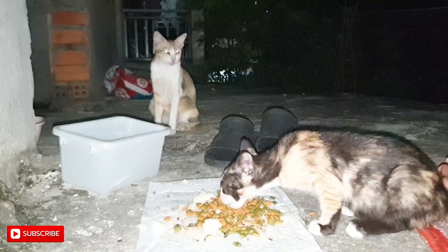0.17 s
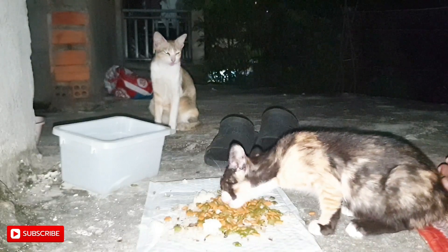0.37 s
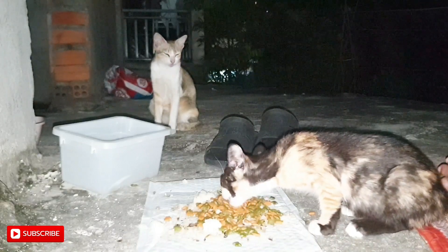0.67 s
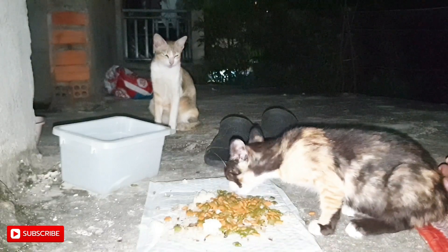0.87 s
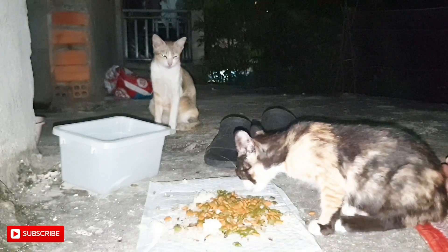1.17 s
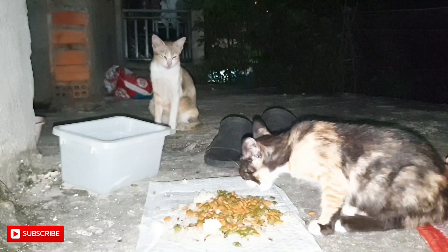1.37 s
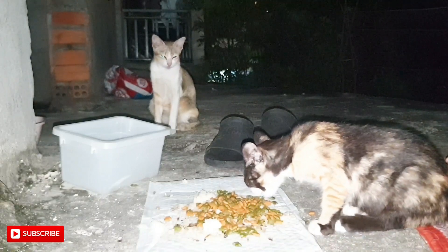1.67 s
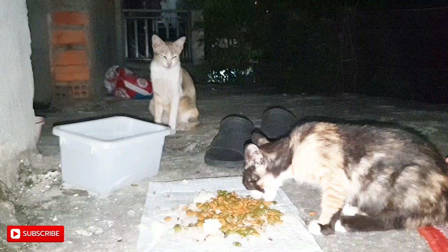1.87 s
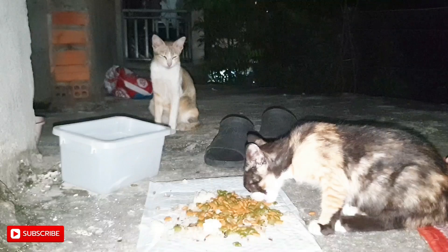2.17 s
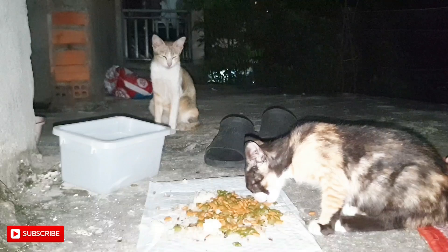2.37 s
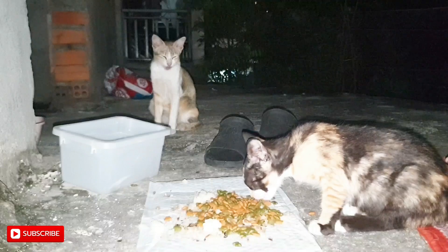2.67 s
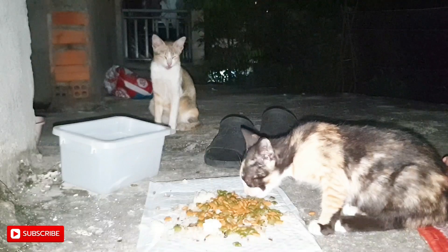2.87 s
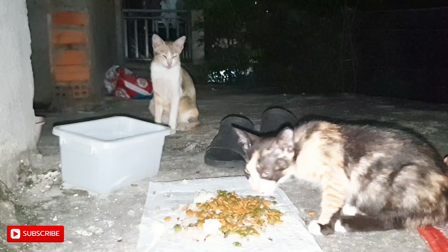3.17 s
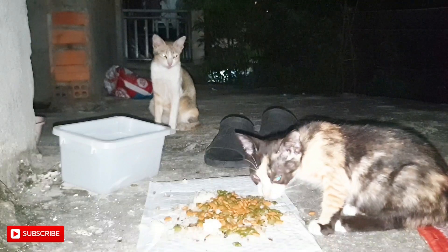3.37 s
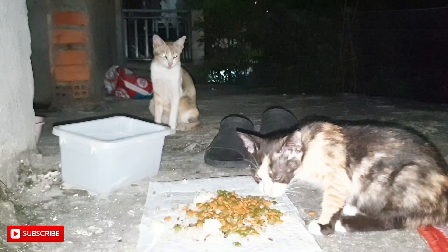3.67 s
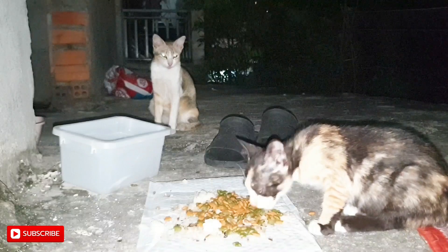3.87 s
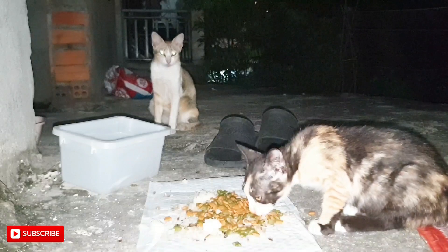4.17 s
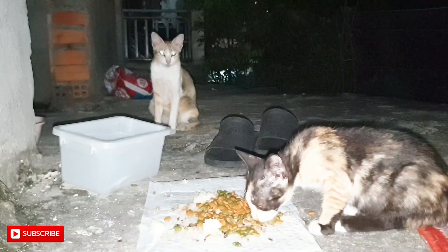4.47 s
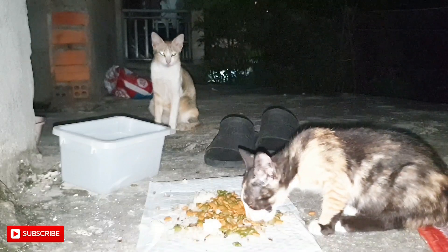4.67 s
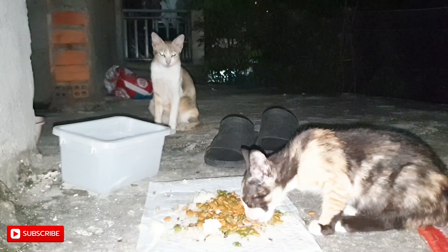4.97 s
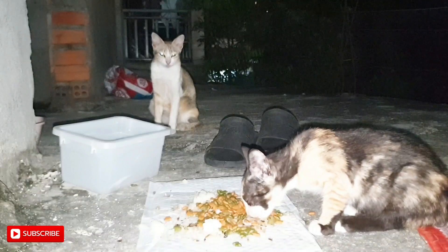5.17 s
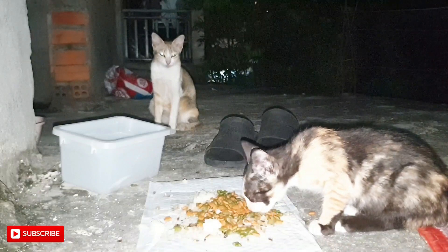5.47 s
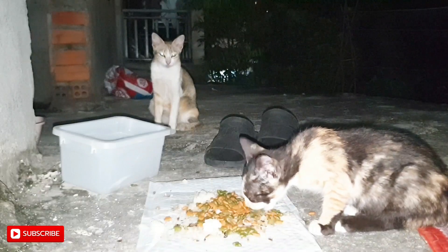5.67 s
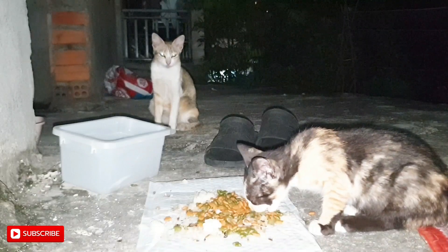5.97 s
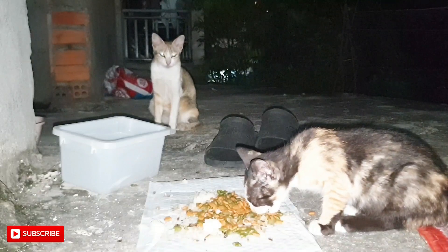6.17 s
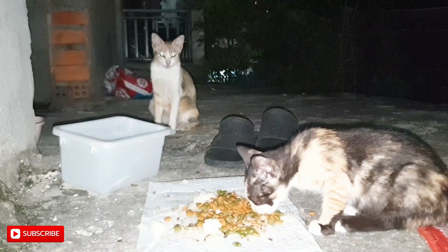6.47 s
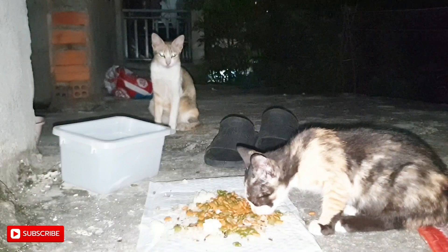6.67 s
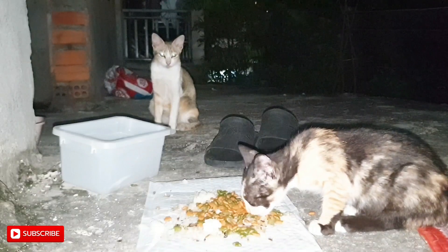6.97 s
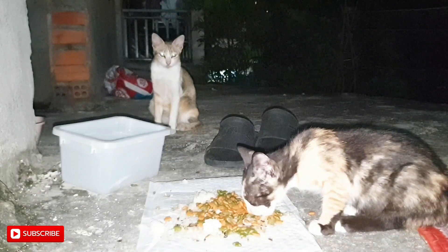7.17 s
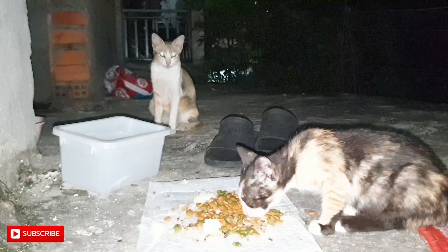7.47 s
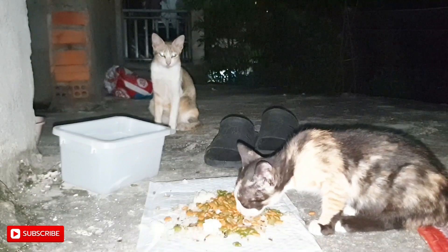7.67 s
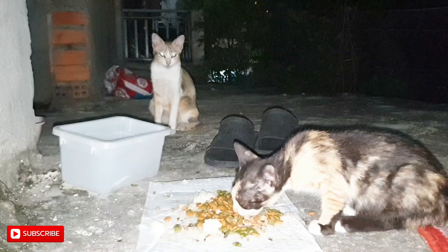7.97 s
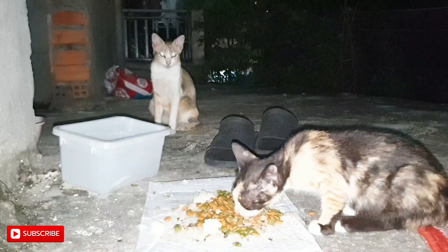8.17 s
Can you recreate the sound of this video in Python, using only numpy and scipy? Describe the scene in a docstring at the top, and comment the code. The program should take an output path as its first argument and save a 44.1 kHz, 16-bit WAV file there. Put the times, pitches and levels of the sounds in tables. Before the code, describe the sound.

A quiet concrete yard at night, heard on a hand-held camera with sound mostly on the left. Low traffic rumble and a wavering hum run throughout; a distant engine rises in pitch and fades by about 3.4 s, while the drone slowly recedes. From 0.15 s, faint dry scrapes around 3 kHz repeat every quarter second or so. Cracks of kibble at 1.7 and 2.0 s mix with tiny ratcheting creaks until 2.9 s. From 3 to 4.8 s fingers and cloth rustle lightly, with a very short rough squeal at 3.7 s. Scraping continues; sharp cracks land at 5.4 and 6.0 s. From 6.4 to 7.4 s louder creaks come in regular strokes, with a second squeal at 6.9 s and thin peeps. From 7.6 s close, hollow rubbing swells, with strong cracks near 7.8 and 8.1 s, ending at 8.3 s with soft microphone hiss.

```python
"""Far traffic rumbles and fades over a yard at night, heard by a hand-held camera with its right port
almost covered. A dry joint rocks, scraping, creaking and twice squealing; a cat cracks kibble; fingers and
cloth rustle and tick on the camera. The joint rings with noise and slips, squeals stack sine overtones, cracks
are struck resonances, rustling is shaped noise and clicks, traffic is noise bands and sines. Each port hisses."""
import sys
import numpy as np
from scipy import signal
from scipy.fft import rfft, irfft, next_fast_len
from scipy.io import wavfile
from scipy.ndimage import uniform_filter1d, map_coordinates

SR = 44100
rng = np.random.default_rng(int(sys.argv[2]) if len(sys.argv) > 2 else 0)


def pcm_store(signal):
    """Save signal as 16-bit PCM."""
    levels = np.round(np.clip(np.atleast_2d(signal), -1, 1) * 32767)
    wavfile.write(sys.argv[1], SR, levels.astype(np.int16).T)


N = 366012

# how sounds close to the camera divide between the ports: pitch_hz [Hz], left_over_right_db [dB]
CLOSE_BALANCE = [(1500, 31.5), (5000, 25), (7500, 21), (9500, -3), (10500, -5.5), (12000, 8), (15000, 19)]
# how the joint divides between the ports: pitch_hz [Hz], left_over_right_db [dB]
JOINT_SIDES = [(1600, 32.5), (3200, 17), (4800, 16), (9000, 9)]
# treble colour of rubbing, also used for cracking: pitch_hz [Hz], level_db [dB per Hz, relative]
RUB_TREBLE = [(4410, -54), (7500, -31), (7940, -32), (8670, -12.5), (9740, -0.5), (10500, 6.5),
              (12600, 2.5), (15100, 6.5), (15900, -12.5)]


def amp(db):
    """Gain of a level in dB."""
    return 10 ** (np.asarray(db) / 20)


def unit(x):
    """x at rms 1."""
    return x / np.sqrt(np.mean(x ** 2) + 1e-30)


def along(points, hz):
    """Reads a curve of (Hz, value) points on a log frequency axis."""
    f, v = np.transpose(points)
    return np.interp(np.log(hz + 1), np.log(f + 1), v)


def played(rows):
    """First sample, and one value per sample for each column while the table lasts."""
    s, *cols = np.transpose(rows)
    n = np.arange(round(s[0] * SR), min(round(s[-1] * SR), N))
    return n[0], [np.interp(n / SR, s, c) for c in cols]


def add(track, start, sound):
    """Mixes a sound into the track."""
    end = min(start + len(sound), N)
    track[start:end] += sound[:end - start]


def wobble(rate):
    """A smooth random curve, rate knots a second."""
    knots = rng.standard_normal(int(N * rate / SR) + 4)
    return map_coordinates(knots, [np.arange(N) * rate / SR])


def sine(pitch_hz):
    """A sine that follows a changing pitch."""
    return np.sin(2 * np.pi * np.cumsum(pitch_hz) / SR)


def filtered(x, response):
    """x shaped by a response that may also shift phase."""
    m = next_fast_len(x.shape[-1] + 8192)
    return irfft(rfft(x, m) * response(np.fft.rfftfreq(m, 1 / SR)), m)[..., :x.shape[-1]]


def resonance(centre_hz, width_hz):
    """One way a body can ring: strongest at its centre, starting only when driven."""
    return lambda f: 1j * f * width_hz / (centre_hz ** 2 - f * f + 1j * f * width_hz)


def noise(spectrum):
    """Two unrelated noises of one colour, rms 1."""
    return unit(filtered(rng.standard_normal((2, N)), lambda hz: amp(along(spectrum, hz))))


def ports(pair, balance, alike):
    """The open left port hears the first of the pair; the covered right one a reweighted mix of both."""
    def response(hz):
        share = np.clip(along(alike, hz), -1, 1)  # left-right likeness
        weak = amp(-along(balance, hz))
        # the two port gains average 1 at every frequency
        return 2 / (1 + weak) * np.array([1 + 0 * hz, weak * share, weak * np.sqrt(1 - share ** 2)])
    left, same, other = filtered(pair[[0, 0, 1]], response)
    return np.array([left, same + other])


def walls(x):
    """The yard walls answer with decaying noise, each frequency dying at its own speed."""
    # how long the answer takes to fall 60 dB: pitch_hz [Hz], fall_s [s]
    decay = [(1000, 0.12), (3000, 0.18), (8000, 0.037)]
    hz, t, z = signal.stft(rng.standard_normal((2, SR // 2)), SR, nperseg=256)
    tail = signal.istft(z * amp(-60 * t / along(decay, hz)[:, None]), SR, nperseg=256)[1]
    late = np.pad(x, (300, 0))[None]  # samples of delay
    return signal.fftconvolve(late, tail / np.linalg.norm(tail[0]), axes=1)[:, :N]


def through_joint(drive, envelope, centre_hz, width_hz):
    """The joint's body rings in one steep band, passes little treble and outlasts the stroke a moment."""
    def body(f):
        band = resonance(centre_hz, width_hz)(f) * resonance(centre_hz, 3.2 * width_hz)(f) ** 3
        return band / (1 + 1j * f / 4000) ** 4
    level = np.sqrt(np.mean(filtered(drive, body) ** 2))
    return filtered(np.pad(drive * envelope, (0, 400)), body) / level


def joint():
    """Scrapes, creaks and peeps of the dry joint, with the yard walls answering."""
    dry = scrapes() + creaks() + peeps()
    return ports(dry + amp(-19.5) * walls(dry), JOINT_SIDES, [(1000, 1.0)])


def scrapes():
    """Smooth sliding drives the joint with noise, ringing a drifting band and a thin upper mode."""
    # smooth strokes: start_s [s], length_s [s], level_db [dB]
    strokes = [(0.154, 0.09, -70.5), (0.361, 0.11, -71), (0.568, 0.13, -71), (0.755, 0.12, -71),
               (0.969, 0.15, -70.5), (1.217, 0.063, -69.5), (1.427, 0.096, -70.5), (1.905, 0.36, -70.5),
               (2.969, 0.14, -69), (3.224, 0.086, -73.5), (3.434, 0.1, -67), (3.843, 0.1, -68),
               (4.015, 0.2, -72), (4.258, 0.094, -74), (4.545, 0.18, -72.5), (4.809, 0.16, -73.5),
               (5.075, 0.15, -70), (5.33, 0.15, -70.5), (5.607, 0.12, -69.5), (5.862, 0.14, -71.5),
               (6.137, 0.13, -73.5), (6.409, .14, -69.5), (6.696, 0.13, -68.5), (6.963, 0.24, -70),
               (7.172, .14, -69)]
    # the drifting band: start_s [s], centre_hz [Hz], width_hz [Hz], upper_mode_db [dB, relative]
    drift = [(.62, 3410, 60, -20), (.8, 3260, 248, -26), (2.9, 3220, 380, -17), (3.4, 3360, 200, -17),
             (4.9, 3410, 380, -7), (6.1, 3440, 380, -12), (7.2, 3040, 298, -25)]
    upper_hz, upper_width_hz = 4015, 130
    dry = np.zeros(N)
    when, centre, spread, upper_db = np.transpose(drift)
    for s, length, db in strokes:
        u = np.linspace(0, 1, round(length * SR))
        drive = rng.standard_normal(len(u))
        envelope = amp(db) * np.sin(np.pi * u) ** 0.45
        main = through_joint(drive, envelope, np.interp(s, when, centre), np.interp(s, when, spread))
        upper = through_joint(drive, envelope, upper_hz, upper_width_hz)
        add(dry, round(s * SR), main + amp(np.interp(s, when, upper_db)) * upper)
    return dry


def creaks():
    """The joint sticks and slips: each slip is a click that rings three modes and drags grit behind it."""
    # sticking strokes: start_s [s], length_s [s], loudest_at [0-1 of the stroke], top_db [dB],
    # slips_per_s [1/s, before it quickens], centre_hz [Hz]
    strokes = [(1.529, 0.032, 0.1, -53, 1030, 3030), (1.789, 0.022, 0.16, -57.5, 280, 3250),
               (2.096, 0.049, 0.73, -53.5, 330, 3270), (2.255, 0.026, 0.48, -50.5, 590, 3310),
               (2.355, 0.018, .1, -59.5, 340, 3270), (2.396, 0.0058, .2, -58, 404, 3300),
               (2.448, 0.0087, 0.2, -60, 480, 3200), (2.461, 0.027, 0.78, -52.5, 290, 3290),
               (2.5804, 0.024, 0.35, -52, 480, 3200), (2.679, 0.015, 0, -58.5, 460, 3200),
               (2.694, 0.068, 0, -64, 480, 3380), (2.757, 0.011, 0.2, -50, 450, 3200),
               (2.771, 0.029, 0.33, -56.5, 350, 3350), (2.902, 0.031, 0.3, -53, 330, 3180),
               (6.38, 0.032, 0.6, -40.5, 340, 3210), (6.609, 0.067, 0.73, -41.5, 385, 3270),
               (6.851, 0.07, 0.71, -41, 330, 3210), (7.0915, 0.061, 0.67, -41.5, 310, 3160),
               (7.261, 0.023, 0.27, -50.5, 400, 3220), (7.339, 0.056, 0.81, -41, 335, 3120),
               (7.451, 0.0059, 0.34, -51.5, 398, 3200), (7.479, 0.034, 0.26, -54.5, 360, 3200),
               (7.595, 0.023, 0.3, -50.5, 320, 3190), (7.7, 0.013, .4, -59, 450, 3200),
               (7.787, .014, .4, -55, 400, 3100), (7.903, 0.022, 0.16, -50, 450, 3030),
               (7.99, 0.015, 0.3, -63, 400, 3170)]
    swell_db, fade_db = 12, 14.5  # rise over a whole stroke, fall after the top
    hard_db, quicken = -42, 0.18  # a hard stroke, and its gain in slip rate
    width_hz = 335  # ring width for a stroke that hard
    scatter_db, breakaway_db = 1.8, 3  # uneven slips; the first one is raised
    dry = np.zeros(N)
    for s, length, top, db, rate, hz in strokes:
        u = np.linspace(0, 1, round(length * SR))
        unsteady = 1 + .2 * uniform_filter1d(rng.standard_normal(len(u)), size=100)
        top = np.clip(top, .05, .95)
        past = (u - top) / (1 - top)  # 0 at the top, 1 at the end
        rising_db = swell_db * top * np.cos(np.pi / 2 * u / top) ** 2
        envelope = amp(db - np.where(u < top, rising_db, fade_db * past.clip(0) ** 0.93))
        speed = np.where(u < top, (u / top) ** 1.7, 1 - .6 * past)
        cycle = np.cumsum(rate * (1 + quicken * amp(db - hard_db) * speed) * unsteady) / SR
        slip_db = rng.normal(0, scatter_db, len(u)) + breakaway_db * (u == 0)
        slips = np.diff(np.floor(cycle), prepend=-1) * amp(slip_db)
        # grit fades within each slip and depends on speed and progress through the stroke
        grit = (.035 + .07 * speed * u) * rng.standard_normal(len(u)) * (1 - cycle % 1)
        drive = slips + grit
        # harder strokes ring wider
        main = through_joint(drive, envelope, hz, width_hz * amp(0.19 * (db - hard_db)))
        # the higher mode opens with speed
        higher = through_joint(drive, envelope * (.25 + 0.62 * speed), 3800, 380)
        lower = through_joint(drive, envelope, 2480, 520)
        add(dry, round(s * SR), main + amp(-12.5) * higher + amp(-15.5) * lower)
    return dry


def peeps():
    """Thin tones: two nearly level ones echo the second squeal, the others arch up and back down."""
    # start_s [s], length_s [s], top_hz [Hz], arch_hz [Hz], level_db [dB]
    thin_tones = [(6.927, 0.02, 3200, 30, -56), (6.944, 0.0085, 3200, 30, -62),
                  (7.149, 0.028, 5110, 400, -73), (7.238, 0.038, 5460, 693, -78),
                  (7.309, 0.025, 5060, 350, -73.5), (7.37, .016, 5200, 300, -71),
                  (7.47, .08, 5760, 700, -80), (8.17, .06, 5360, 250, -79)]
    dry = np.zeros(N)
    for s, length, top_hz, arch_hz, db in thin_tones:
        u = np.linspace(-1, 1, round(length * SR))
        add(dry, round(s * SR), amp(db) * np.sqrt(1 - u ** 2) * sine(top_hz - arch_hz * u ** 2))
    return dry


def squeals():
    """Slips lock into a tone: rough overtones slide on, hold and flick off, each squeal sent its own way."""
    # start_s [s], length_s [s], attack_s [s], first_hz [Hz], slide_s [s], flick_s [s], flick_hz [Hz],
    # level_db [dB], middle_overtones_db [dB], grit_db [dB], roughness_db [dB], half_order_db [dB],
    # overtones_sag [dB a second], left_over_right_db [dB, added to the joint's]
    cries = [(3.688, 0.038, 0.0069, 944, .012, 0.013, 1860, -40.5, 1.5, -3, 4, -4, 205, -3.5),
             (6.894, 0.03, 0.012, 1573, 0.011, 0.0063, 1720, -38, -23, -25, 0.5, -40, 20, -6)]
    # colour of the overtones: pitch_hz [Hz], level_db [dB]
    colour = [(1000, -42.5), (1350, -30), (1600, 4), (1850, -0.5), (2300, -10), (3200, 2), (4200, 2.5),
              (4800, -5), (5300, -26), (6400, -34), (8000, -47)]
    lock_hz = 1584
    half_after_s, half_db_per_s = .005, 3000  # half orders peak this long after the slide, then drop
    sag_db_per_s, let_go_db = 131, 13  # whole squeal sags; overtones thin as the slip lets go
    out = 0
    for (s, length, rise, first_hz, slide_s, flick_s, flick_hz, db, upper_db, grit_db, shake_db,
         half_db, thin_db, turn_db) in cries:
        t, dry = np.arange(round(length * SR)) / SR, np.zeros(N)
        k = np.arange(2, 13)[:, None] / 2  # whole and half multiples of the pitch
        letting_go = np.clip(1 - (length - t) / flick_s, 0, 1)
        slide_hz = (lock_hz - first_hz) * (1 - np.minimum(t / slide_s, 1) ** 2.24)
        pitch = lock_hz - slide_hz + (flick_hz - lock_hz) * np.minimum(3.0 * letting_go, 1)
        level_db = along(colour, k * pitch) + upper_db * (k > 2) * (k * pitch < 5600)
        level_db += shake_db * np.array([wobble(238)[:len(t)] for _ in k])
        level_db += (half_db - half_db_per_s * np.abs(t - slide_s - half_after_s)) * (k % 1 > 0)
        level_db -= (thin_db * np.maximum(t - slide_s, 0) + let_go_db * letting_go) * (k - 1.5)
        tone = np.sum(amp(level_db) * np.sin(2 * np.pi * k * np.cumsum(pitch) / SR), axis=0)
        grit = unit(filtered(rng.standard_normal(len(t)), lambda f: resonance(4200, 1800)(f) ** 4))
        tone += amp(grit_db - 240 * t) * grit
        envelope = amp(db - sag_db_per_s * t - 10.0 * letting_go)
        envelope = envelope * np.sqrt(1 - letting_go ** 2) * np.minimum(t / rise, 1)
        add(dry, round(s * SR), envelope * tone)
        answer = amp(-15.5) * filtered(walls(dry), resonance(4300, 3500))
        out = out + ports(dry + answer, np.add(JOINT_SIDES, [0, turn_db]), [(1000, 0.95)])
    return out


def cracks_and_ticks():
    """Sharp cracks and ticks close by, some pellets of kibble, some handling of the camera: a short ring,
    a higher snap, a dull body, a spit of treble and a spill of crumbs."""
    # start_s [s], level_db [dB, peak of the ring], ring_hz [Hz], ring_width_hz [Hz, one of three passes],
    # snap_db [dB, over the ring], treble_db [dB, over the ring]
    blows = [(1.678, -51, 3200, 800, -16, -6), (1.6785, -48.5, 2414, 400, -32, -20),
             (2.024, -51.5, 1980, 430, -33, -8), (3.189, -61.5, 2380, 900, -6, 8),
             (3.34, -62, 2400, 900, -15, 10), (3.351, -63, 2390, 900, -17, 8),
             (3.5155, -62, 3270, 430, -24, -10), (5.4322, -44.5, 2810, 430, -26.5, -12),
             (6.0362, -38, 3260, 384, -10, -19), (7.608, -53.5, 3210, 1200, -12, 2),
             (7.6804, -56, 3000, 1200, -14, 7), (7.73, -55, 3000, 1500, -10, 7),
             (7.8104, -36, 2960, 2200, -20, -2.5), (7.8268, -40, 3000, 2500, -8, 3),
             (7.8387, -45, 2000, 1200, -20, 3), (8.0244, -58.5, 3000, 1500, -8, 7),
             (8.079, -37, 3350, 2370, -9.5, -7), (8.176, -62.5, 2960, 1500, -10, 10.5),
             (8.2372, -58, 2510, 1200, -7, -1)]
    spit_s, spit_t60_s, spit_tilt_db = 0.00076, 0.005, 6  # treble peaks after the blow; tilt per octave
    crumb_db, crumb_t60_s = -13.5, 0.033
    snaps, t = np.zeros(N), np.arange(SR // 40) / SR
    blow = signal.unit_impulse(len(t))
    snap = filtered(blow, lambda f: resonance(4820, 750)(f) ** 3)
    body = filtered(blow, lambda f: resonance(1860, 800)(f) ** 3)
    spit_envelope = amp(-60 * np.abs(t - spit_s) / np.where(t < spit_s, spit_s, spit_t60_s))

    def spit_colour(f):
        return amp(along(RUB_TREBLE, f) + spit_tilt_db * np.log2(f / 11000 + .01))
    for s, db, hz, width_hz, snap_db, treble_db in blows:
        ring = filtered(blow, lambda f: resonance(hz, width_hz)(f) ** 3)
        spit = filtered(rng.standard_normal(len(t)) * spit_envelope, spit_colour)
        crumbs = rng.standard_normal(len(t)) * amp(-60 * t / crumb_t60_s)
        crumbs = filtered(crumbs, lambda f: resonance(hz, width_hz + 600)(f) ** 2)
        body_db = -1.5 + 0.54 * treble_db  # a sharper crack also thuds harder
        parts = zip((ring, snap, spit, body, crumbs), (0, snap_db, treble_db, body_db, crumb_db))
        crack = sum(amp(db + level) * part / np.abs(part).max() for part, level in parts)
        add(snaps, round(s * SR), crack)
    return ports(snaps + amp(-22.0) * walls(snaps), CLOSE_BALANCE, [(1000, .6)])


def rustle():
    """Fingers and cloth rub by the ports: grainy hiss, body and crackle, hollow when the grip closes."""
    # bouts of rubbing, each a list of: start_s [s], level_db [dB]
    bouts = [
        [(3, -84.5), (3.09, -70.5), (3.16, -78), (3.24, -79), (3.34, -71), (3.43, -74), (3.73, -64.5),
         (3.92, -77), (4.05, -65), (4.14, -85.5), (4.24, -72), (4.3, -64), (4.38, -84), (4.42, -71),
         (4.47, -85), (4.72, -78.5), (4.85, -85)],
        [(5.25, -87), (5.37, -75.5), (5.52, -77), (5.6, -94)],
        [(6.85, -86.5), (6.92, -77.5), (7.14, -71), (7.31, -70.5), (7.36, -84), (7.47, -86), (7.58, -69),
         (7.72, -60.5), (7.85, -59.5), (7.96, -62.5), (8.09, -62), (8.2, -72), (8.3, -69)],
    ]
    # the top octave in each bout: level_db [dB, over the hiss]
    top_octave = [3.5, -9, -16]
    # duller colour of the rub: pitch_hz [Hz], level_db [dB per Hz, relative]
    body_colour = [(2060, -22), (3500, -1.5), (4710, -10), (6550, -20.5), (7440, -29.5), (8000, -27.5),
                   (10400, -55.5), (17600, -120)]
    # hollow resonances of the grip: pitch_hz [Hz], width_hz [Hz], level_db [dB]
    modes = [(1784, 330, 1), (2820, 290, -1), (3200, 650, -7.5), (4850, 510, -10.5), (5700, 1200, -17)]
    tight_s, opens_s, tight_db = 7.667, 8.07, -56.5  # the hand closes, holds, opens
    close_db_per_s, sag_db_per_s, open_db_per_s = 56, 10, 82  # opening adds to the sag
    crackle_per_s, crackle_db, crackle_spread_db = 120, 11, 2.5  # fibres snapping in the rub
    rub_db, top_db = np.full((2, N), -120.)
    for rows, bright_db in zip(bouts, top_octave):
        start, (db,) = played(rows)
        rub_db[start:start + len(db)] = db
        top_db[start:start + len(db)] = db + bright_db
    t = np.arange(N) / SR
    slope = np.where(t < tight_s, close_db_per_s, sag_db_per_s)
    grip_db = tight_db - slope * np.abs(t - tight_s) - open_db_per_s * np.maximum(t - opens_s, 0)

    def hollow(f):
        # neighbouring modes have opposite signs
        rings = sum((-1) ** k * amp(db) * resonance(hz, w)(f) for k, (hz, w, db) in enumerate(modes))
        return rings * resonance(2800, 4000)(f) / (1 + (f / 6800) ** 12)
    grain = 1.1 * wobble(150) + 1.4 * wobble(30) + 1.7 * wobble(13)  # dB
    rub = amp(rub_db + grain) * noise(RUB_TREBLE)
    rub += amp(rub_db - 4.5 + 1.37 * grain) * noise(body_colour)
    rub += amp(top_db + grain) * noise([(9000, -60.0), (12500, -1.5), (14000, -1), (15900, 0.0)])
    rub += amp(grip_db + 0.96 * grain) * unit(filtered(rng.standard_normal((2, N)), hollow))
    snaps = rng.random((2, N)) < crackle_per_s / SR
    snaps = snaps * amp(crackle_spread_db * rng.exponential(size=(2, N)))
    rub += filtered(amp(rub_db + crackle_db) * snaps,
                    lambda f: amp(along(RUB_TREBLE, f)) + amp(along(body_colour, f)))
    return ports(rub, CLOSE_BALANCE, [(1000, 0.092)])


def traffic():
    """Far traffic: road noise, a hum, passing tones and one engine, weighted between the ports."""
    # left_over_right_db by pitch: pitch_hz [Hz], left_over_right_db [dB]
    balance = [(60, 25), (130, 24), (290, 26.5), (640, 24.5), (1410, 22.5), (3100, 14.5), (6820, -2.5),
               (15000, -4)]
    # left-right likeness: pitch_hz [Hz], likeness [-1 to 1]
    alike = [(60, 0.92), (150, 0.81), (380, 0.72), (950, 0.08), (2380, -0.2), (5980, -0.41), (15000, -0.14)]
    far = road() + hum()
    # single tones go in the first of the pair; the ports share them out
    far[0] += far_tones() + engine()
    return ports(far, balance, alike)


def road():
    """Noise bands: a swelling rumble, a drone moving off, a patchy wash that follows it, and tyre hiss."""
    # traffic moving off: start_s [s], level_db [dB, drone]
    moving_off = [(0, -39), (.9, -40), (1.5, -41.5), (2.6, -43), (4.5, -44.5), (6.5, -46.5), (8.3, -45)]
    # colours of rumble, drone and wash, each: pitch_hz [Hz], level_db [dB per Hz, relative]
    rumble_colour = [(15, -72), (25, -29.5), (35, -25), (53, 7), (91, 1), (118, -26.5), (130, -20.5),
                     (170, -37.5), (290, -120)]
    drone_colour = [(59, -19.5), (100, 1), (194, -6.5), (265, -10), (307, -18.5), (361, -24), (420, -40.5),
                    (550, -33), (920, -120)]
    wash_colour = [(190, -16), (330, 0), (499, -8), (765, -9), (934, -8.5), (1950, -23.5), (2280, -20),
                   (2860, -23.5), (3410, -24), (3790, -31), (4390, -35.5), (8000, -50.5), (10400, -91),
                   (17600, -120)]
    wash_db, wash_follows = -54.5, 0.39  # when the drone is loudest; dB for each dB of drone
    tyre_s, tyre_db, tyre_db_per_s = 1.2, -62, 2.5  # tyre hiss at its nearest, how fast it comes and goes
    drone_db = whole_scene(moving_off)
    off_db = drone_db - drone_db.max()
    rumble = amp(-43.5 + wobble(2.23)) * noise(rumble_colour)
    drone = amp(drone_db) * noise(drone_colour)
    wash = amp(wash_db + wash_follows * off_db) * patchy(noise(wash_colour), depth_db=2.2)
    tyres = unit(filtered(rng.standard_normal((2, N)), lambda f: resonance(1400, 1100)(f) ** 2))
    tyres = amp(tyre_db - tyre_db_per_s * np.abs(np.arange(N) / SR - tyre_s)) * tyres
    return rumble + drone + wash + tyres


def whole_scene(rows):
    """A level table read from the start, its last value held to the end."""
    level_db = played(rows)[1][0]
    return np.pad(level_db, (0, N - len(level_db)), "edge")


def patchy(pair, depth_db):
    """Narrow patches of a noise swell and sink on their own."""
    z = signal.stft(pair, nperseg=2048)[2]
    field = uniform_filter1d(rng.standard_normal(z.shape[1:]), size=4, axis=0)
    field = uniform_filter1d(field, size=8, axis=1)
    return unit(signal.istft(z * amp(depth_db * unit(field)), nperseg=2048)[1][:, :N])


def hum():
    """A low sine whose pitch and level waver."""
    # start_s [s], level_db [dB rms]
    loudness = [(0, -44.5), (.3, -40), (.9, -52), (2.5, -60), (3.05, -46.5), (4.15, -46), (4.7, -54.5),
                (5.3, -41), (5.8, -42), (6.3, -50.5), (7, -57), (8.3, -51)]
    level_db = whole_scene(loudness) + 0.73 * wobble(4.01)
    return np.sqrt(2) * amp(level_db) * sine(91.3 + wobble(3)) * np.ones((2, 1))


def far_tones():
    """Faint tones that swell and go, gliding with a slight waver."""
    # start_s [s], length_s [s], pitch_hz [Hz, mid-glide], level_db [dB], glide [Hz a second]
    tones = [(0.6, 0.37, 1265, -60, 252), (.9, 0.56, 853, -67, 29), (1.001, 0.19, 1570, -64, 10),
             (1.103, 0.86, 285.6, -56.5, 0.5), (1.25, .25, 957, -66, 150), (2.306, 1, 369, -60.5, 1),
             (2.557, 0.25, 705, -67, 0), (3.307, 0.66, 613, -66, 1.5), (4.299, 0.97, 374, -59, 0),
             (4.601, 0.3, 870, -64, 0)]
    out = np.zeros(N)
    for s, length, hz, db, glide in tones:
        u = np.linspace(0, np.pi, round(length * SR))
        pitch = hz * (1 + 0.0118 * wobble(7.83)[:len(u)]) + glide * length * (u / np.pi - .5)
        add(out, round(s * SR), amp(db + 4.6 * wobble(9)[:len(u)]) * np.sin(u) * sine(pitch))
    return out


def engine():
    """An engine pulls away: sines at multiples of its wavering firing rate."""
    # start_s [s], firing_hz [Hz, before waver], level_db [dB, before the overtone levels]
    pulling_away = [(0, 22.42, -50), (1.24, 25.08, -51.5), (2.25, 27.69, -50), (2.9, 28.02, -57),
                    (3.4, 27.43, -61)]
    # overtones: multiple [of the firing rate], level_db [dB, relative]
    orders = [(3, -18), (4, -1), (5, 1), (6, 5), (7, -10.5), (8, -9.5), (9, -7), (10, 2.5), (11, -5),
              (13, -17)]
    out = np.zeros(N)
    start, (firing, level_db) = played(pulling_away)
    firing = firing + .25 * wobble(5.014)[:len(firing)]
    for k, db in orders:  # each overtone wavers in level at random
        waver_db = 3 * wobble(2.65)[:len(firing)]
        phase = k * np.cumsum(firing) / SR + rng.random()
        add(out, start, amp(level_db + db + waver_db) * np.sin(2 * np.pi * phase))
    return out


def scene():
    """Everything that reaches the two ports."""
    return joint() + squeals() + cracks_and_ticks() + rustle() + traffic()


def record(dry):
    """Each microphone adds its own hiss; nothing is kept above the band limit."""
    # microphone self-noise: pitch_hz [Hz], level_db [dB per Hz, relative]
    hiss_colour = [(3530, -32), (6000, -42), (6750, -0.5), (8150, -5.5), (9430, 4.5), (11800, 11.5),
                   (14900, 8.5), (15900, 4.5)]
    top_hz = 15830
    hiss = amp([[-76.], [-78.5]]) * noise(hiss_colour)  # left, right dB
    return filtered(dry + hiss, lambda hz: hz < top_hz)


dry = scene()
out = record(dry)
pcm_store(out)
```